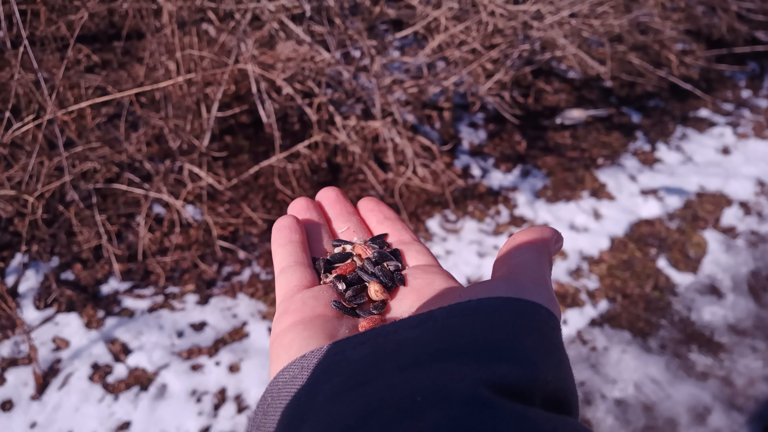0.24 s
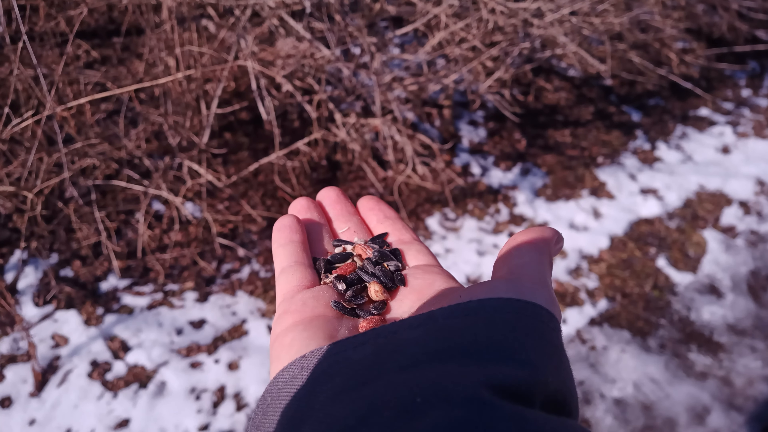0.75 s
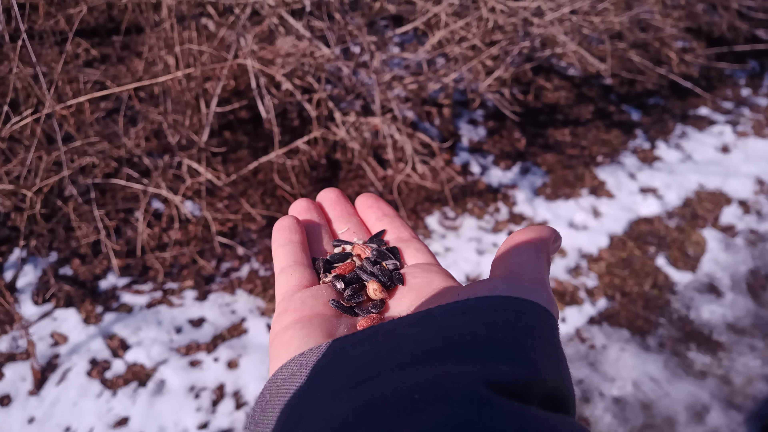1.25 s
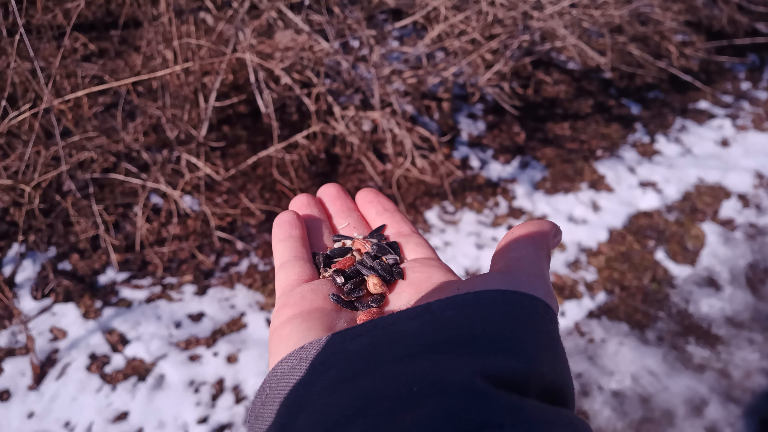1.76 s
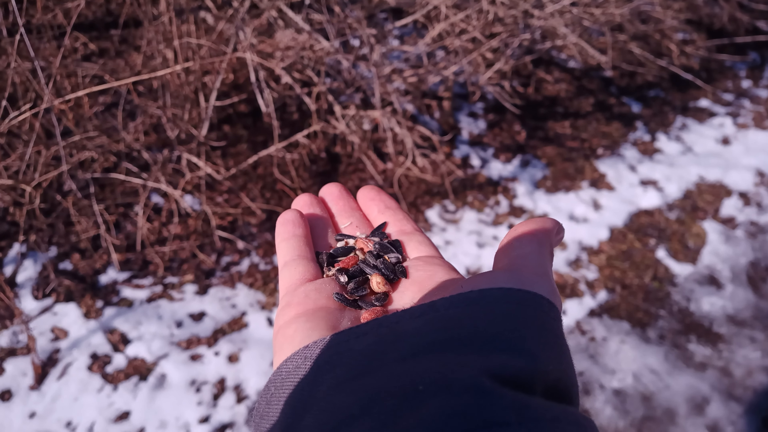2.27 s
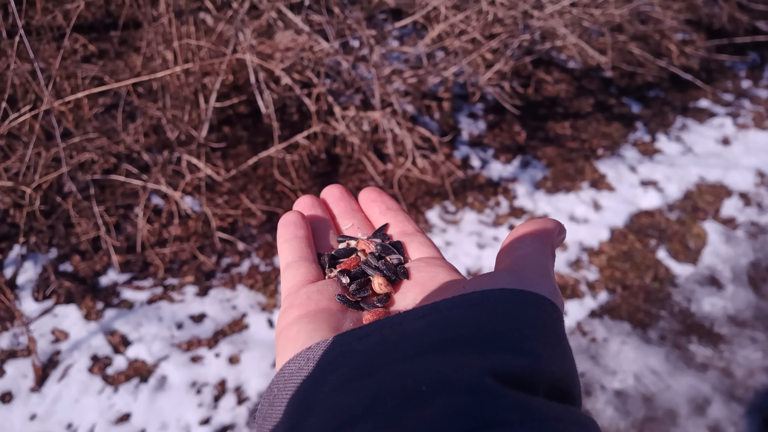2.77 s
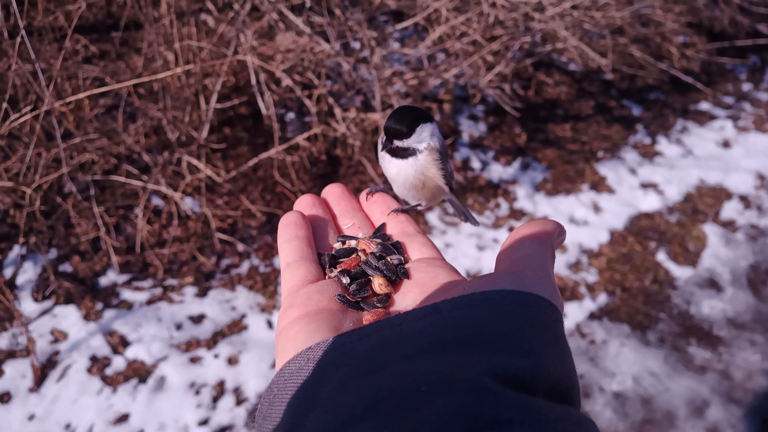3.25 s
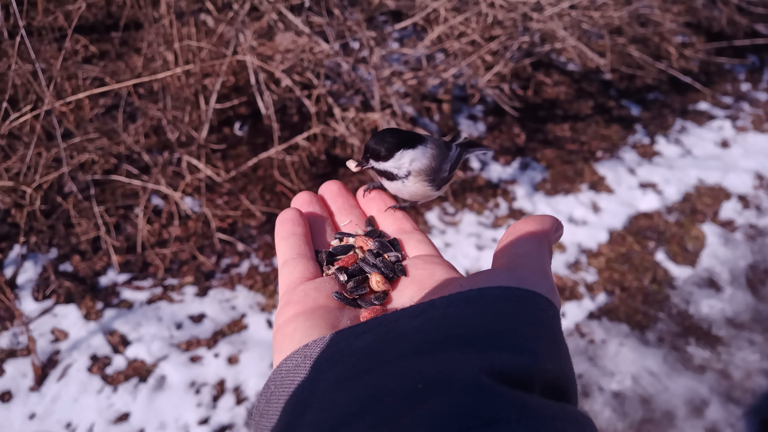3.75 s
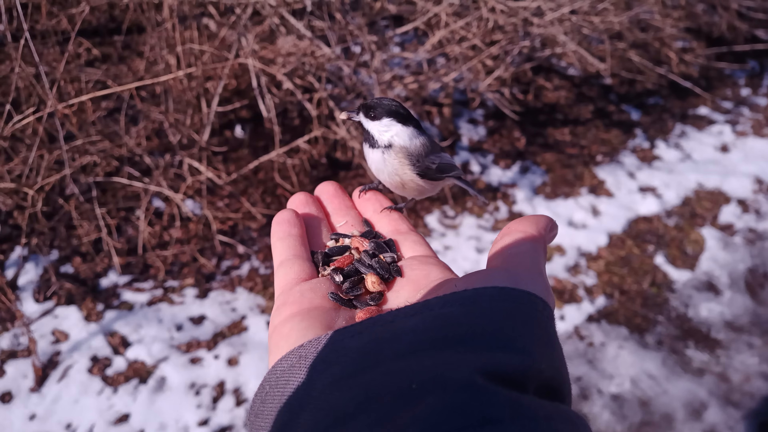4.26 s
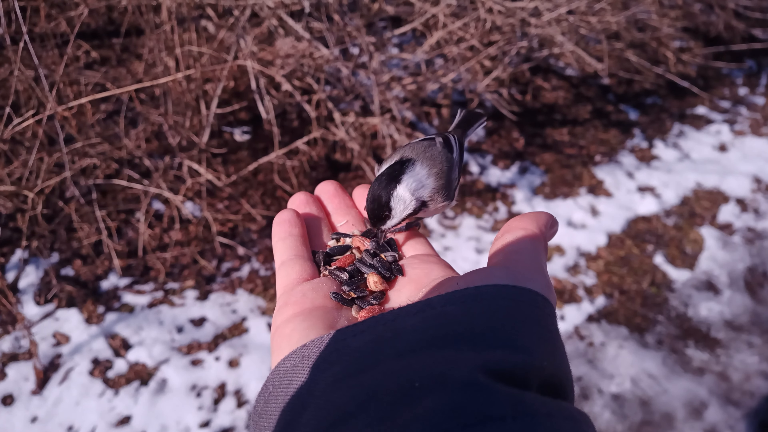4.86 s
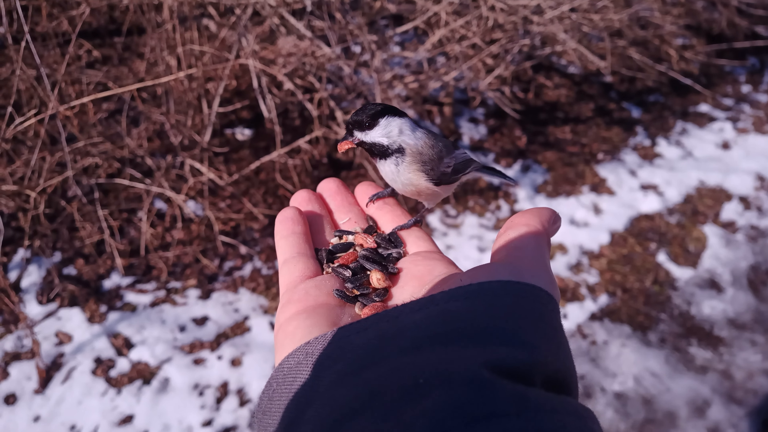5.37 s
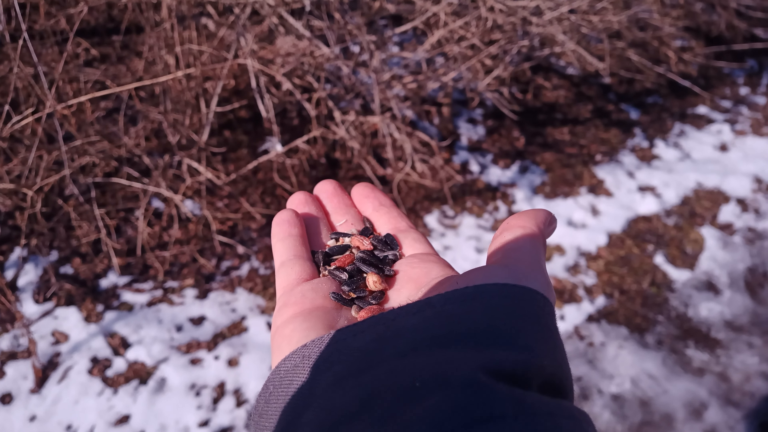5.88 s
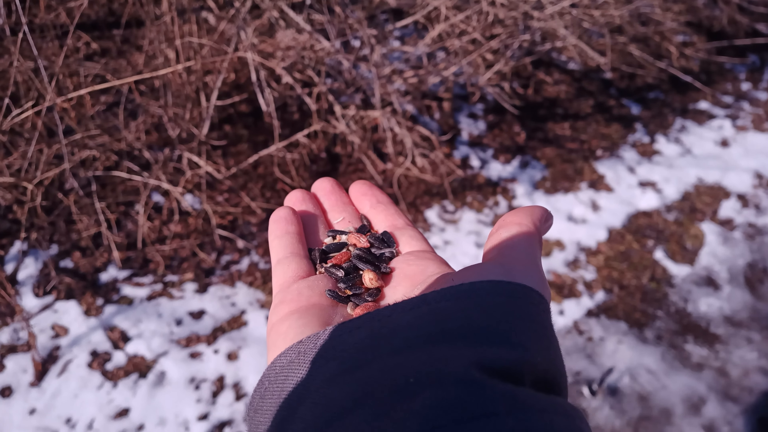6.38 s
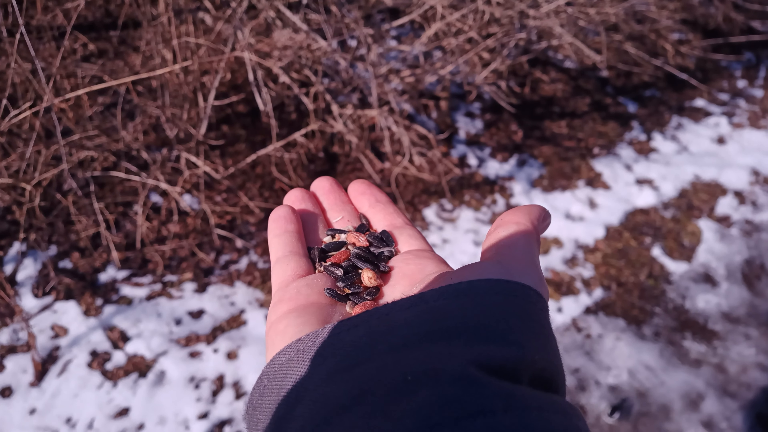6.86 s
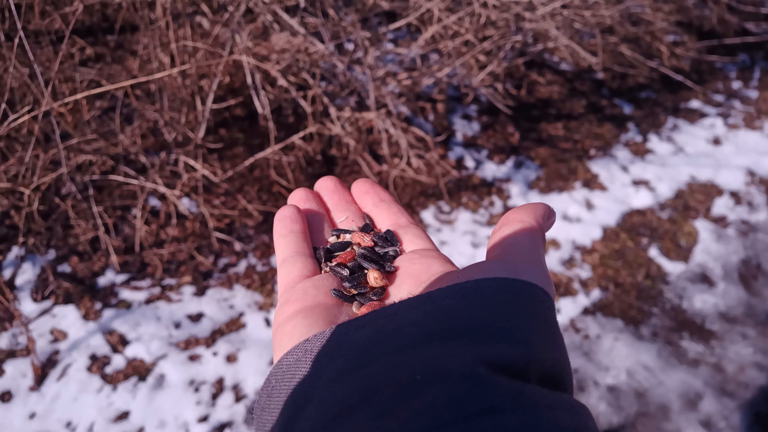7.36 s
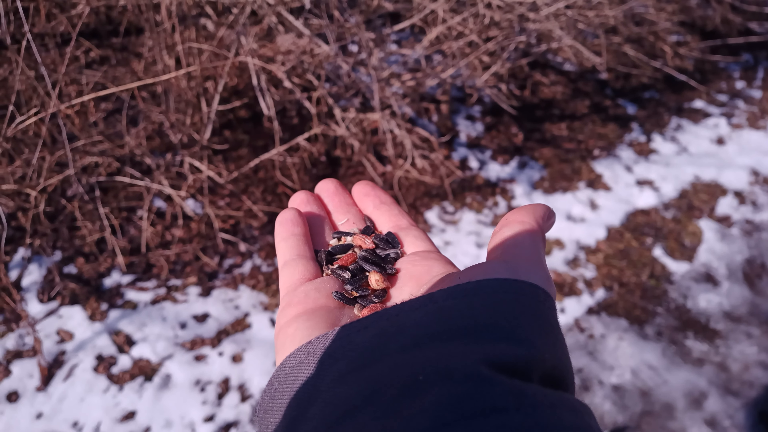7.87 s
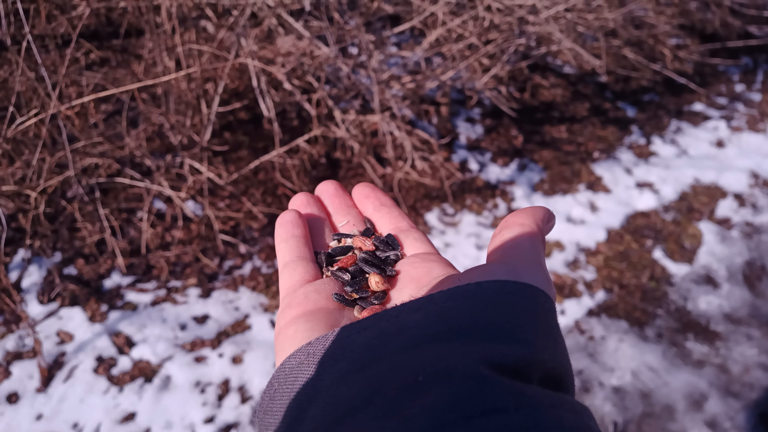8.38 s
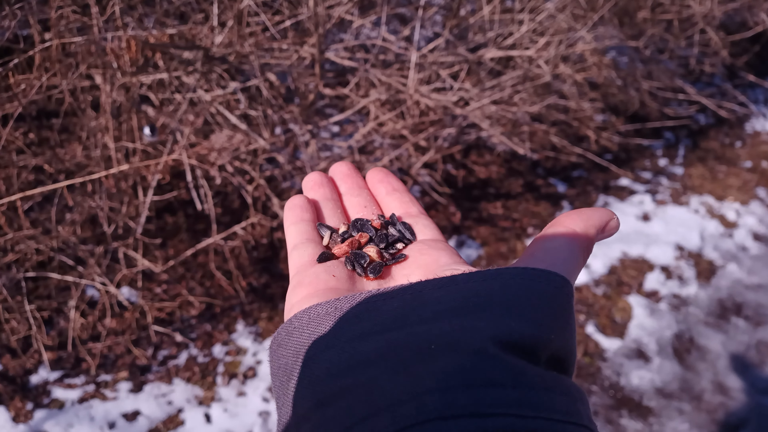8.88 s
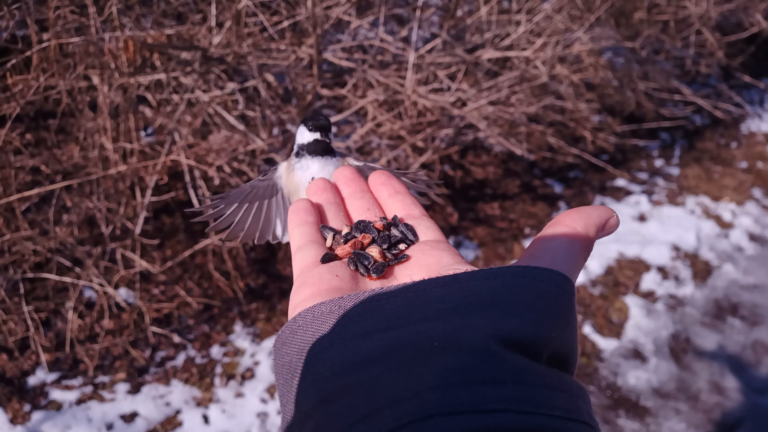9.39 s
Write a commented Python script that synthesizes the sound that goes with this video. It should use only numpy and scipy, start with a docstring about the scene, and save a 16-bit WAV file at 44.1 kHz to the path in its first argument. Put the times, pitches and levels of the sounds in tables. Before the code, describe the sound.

Chickadees give thin high chips, quick falling sweeps and buzzy notes outdoors; one flutters in, ticks at seeds and whirs away, before a brief dropout.

```python
"""Winter brush around an open hand with seeds, where chickadees flock. Gliding sines make the clear sweeps
and whistles close by and, with more echo, the blurred whistles farther off; combs of beating lines make
the buzzy notes and a puffed sine makes the trill. Wings flutter in shaped noise, claws and seeds tick as
cracks with a tiny ring, and far traffic hums in coloured noise over a low rumble, a blur of distant birds
and hiss. Near the end the sound is cut to silence and fades back in."""
import sys
import numpy as np
from scipy import signal
from scipy.fft import rfft, irfft, next_fast_len
from scipy.io import wavfile
from scipy.ndimage import uniform_filter1d, map_coordinates

SR = 44100
rng = np.random.default_rng(int(sys.argv[2]) if len(sys.argv) > 2 else 0)


def persist_wave(psi):
    """Save psi, clipped to +-1, as 16-bit WAV."""
    counts = np.round(np.clip(psi, -1, 1) * 32767).astype(np.int16)
    wavfile.write(sys.argv[1], SR, np.atleast_2d(counts).T)


N = 424683

# All table levels are mix levels, ahead of the microphone gain; spectra are relative shapes.

# Air bed over time: (time [s], rumble level [dB], traffic hum level [dB], far flock level [dB])
AIR_LEVELS = [(0, -60, -58, -66), (.55, -56, -59, -63), (1.17, -53, -58, -65.5), (2.15, -60.5, -59, -63),
              (2.49, -57, -59.5, -68.5), (3.5, -57.5, -61.5, -70), (4.62, -58, -59, -67.5),
              (5.36, -57.5, -61, -69.5), (5.8, -51, -59, -69.5), (6.06, -60.5, -62.5, -70),
              (6.54, -57, -60.5, -68), (7.11, -55, -61.5, -68.5), (7.55, -56.5, -60.5, -66.5),
              (8.46, -55, -60, -69), (8.9, -55.5, -57.5, -71), (9.3, -55, -59.5, -65),
              (9.63, -58, -61.5, -72)]
# Spectrum of the low rumble: (frequency [Hz], density [dB per Hz])
RUMBLE_SPECTRUM = [(20, -49), (35, -26.5), (55, -8.5), (80, -2), (120, 0.5), (160, -3), (220, -16.5),
                   (320, -32), (500, -60.5)]
# Spectrum of the far traffic hum: (frequency [Hz], density [dB per Hz])
HUM_SPECTRUM = [(120, -23.5), (200, -4), (260, -3), (380, -0.5), (550, 0), (800, -4.5), (1100, -8),
                (1600, -14.5), (2200, -22.5), (3500, -61)]
# Spectrum of the distant bird blur: (frequency [Hz], density [dB per Hz])
FLOCK_SPECTRUM = [(900, -25), (1600, -2.5), (2400, 0.5), (3200, -4.5), (5000, -10), (7000, -9.5),
                  (8000, -18.5), (8800, -30.5), (11000, -70)]
# Spectrum of the microphone hiss: (frequency [Hz], density [dB per Hz])
HISS_SPECTRUM = [(6000, -25), (8500, -14), (9800, -11.5), (10300, -12.5), (13700, -11.5), (14800, -4.5),
                 (16000, 2.5)]
HISS_PATCHY_DB = 1.2

# Wing strokes: (time [s], feather hiss drive [dB], air push drive [dB])
WING_STROKES = [(2.2, -61, -60), (2.26, -72, -56), (2.96, -56, -47), (3.005, -62, -48), (3.045, -58, -49),
                (3.1, -58, -56), (3.13, -63, -40.5), (3.191, -66, -45.5), (5.538, -54, -65),
                (5.562, -61, -60), (5.63, -49.5, -51), (5.655, -55, -39.5), (5.686, -59, -36),
                (5.74, -65, -40), (5.792, -76, -41), (5.83, -72, -46), (8.98, -64, -60), (9.02, -67, -56),
                (9.1, -62.5, -62), (9.16, -86, -44.5), (9.245, -63, -53), (9.279, -58.5, -37.5),
                (9.33, -61.5, -50), (9.39, -67, -58), (9.43, -71, -58), (9.47, -68.5, -60)]
# Spectrum of the feather hiss: (frequency [Hz], density [dB per Hz])
FEATHER_SPECTRUM = [(1000, -6.5), (2500, -6.5), (5000, -4.5), (7500, 2.5), (9000, -24.5), (13000, -33)]
FEATHER_PATCHY_DB = 2.5

# Claws and seeds, ahead of the tick colouring: (time [s], drive [dB], ring frequency [Hz])
CLAW_SEED_TICKS = [(3.4416, -49, 7650), (3.5005, -44, 6900), (3.70, -48.5, 5560), (4.146, -50, 6500),
                   (4.21, -51, 6500), (4.4518, -21.5, 6500), (4.966, -32, 6760), (4.983, -38, 6310),
                   (5.0687, -43.5, 6100), (5.0764, -49, 6330), (5.6274, -44, 6180), (9.0934, -38, 8150),
                   (9.285, -33, 6600), (9.3706, -37.5, 5800)]

# Distant slurs that glide to a held pitch, then glide again, some up and some slightly down,
# level ahead of the thinning:
# (time [s], first glide [s], hold [s], last glide [s], start [Hz], held pitch [Hz], end [Hz], level [dB])
DISTANT_SLURS = [(0.033, .08, .005, .005, 7950, 7050, 7020, -56),
                 (0.423, 0.049, .04, .005, 7070, 6660, 6600, -53.5),
                 (1.301, 0.19, 0.074, .01, 8320, 6780, 6740, -51.5),
                 (2.019, 0.2, 0.046, .03, 8300, 6490, 6450, -49.5),
                 (2.82, .2, .04, .01, 8050, 6750, 6490, -51.5),
                 (3.484, 0.041, 0.25, .055, 7800, 6620, 8150, -53.5),
                 (4.377, 0.042, 0.21, 0.053, 7780, 6660, 7520, -55.5),
                 (4.41, 0.081, 0.13, 0.039, 7330, 7400, 7170, -55),
                 (5.206, .12, .03, 0.097, 5750, 6060, 7730, -56),
                 (5.645, .12, .035, .065, 6150, 6620, 8220, -49.5)]
BEST_HZ, THIN_DB_PER_KHZ = 6770, 5.5  # a slur is loudest here and thins away from it
# Faint far peeps: (time [s], length [s], start [Hz], end [Hz], level [dB])
FAR_PEEPS = [(1.275, 0.047, 7920, 8140, -61), (1.97, .07, 7980, 8000, -62), (1.971, .12, 2004, 2080, -60),
             (2.734, .1, 7910, 8450, -60), (3.425, 0.044, 7900, 7740, -60.5),
             (3.725, 0.1, 4470, 4760, -68.5), (3.79, .08, 5000, 5150, -73), (4.571, .13, 4470, 4750, -67.5),
             (4.638, .1, 5000, 5230, -69), (4.658, 0.051, 7570, 7480, -57), (5.426, .08, 7560, 7760, -64),
             (4.07, 0.022, 7900, 7900, -78), (5.87, .12, 8240, 8400, -74),
             (6.555, 0.028, 7300, 7540, -56.5), (8.711, .12, 8040, 8060, -67.5),
             (8.894, 0.14, 7620, 8000, -67), (9.437, 0.028, 6040, 5930, -69)]
PEEP_BEND, PEEP_FADE_DB = .3, 12  # share of the glide done at half length; fade by the end

# Falling sweeps of the nearest bird, level ahead of the throat curve:
# (time [s], length [s], top [Hz], end [Hz], level [dB])
NEAREST_SWEEPS = [(.843, 0.044, 7480, 4710, -27.5), (0.92, .033, 7300, 5720, -27),
                  (0.994, 0.044, 7300, 4220, -24.5), (1.072, .049, 7100, 4220, -26),
                  (1.159, 0.039, 6950, 4400, -23), (1.228, 0.041, 8170, 4750, -26.5),
                  (1.345, 0.023, 6850, 5220, -31.5)]
# Loudness along a sweep: (frequency [Hz], gain [dB])
SWEEP_THROAT_GAIN = [(4200, -16.5), (5750, -15), (6400, 1.5), (7200, -14.5), (8200, -24)]
# Brief straight chips, level ahead of the throat curve:
# (time [s], length [s], start [Hz], end [Hz], level [dB])
BRIEF_CHIPS = [(0, 0.0057, 7800, 5800, -48), (.128, 0.0063, 8250, 4000, -36.5),
               (0.273, 0.0077, 5530, 7100, -38), (.298, 0.01, 8220, 4230, -37),
               (0.408, 0.011, 7060, 6550, -42), (0.689, 0.0083, 7200, 9440, -46),
               (0.78, 0.0058, 8060, 6950, -44), (0.891, 0.007, 6920, 8200, -37),
               (0.939, .008, 8840, 7650, -50), (1.089, .01, 8760, 7300, -45),
               (1.107, .008, 3680, 3340, -39.5), (1.241, 0.0092, 3010, 2840, -45),
               (1.703, .012, 7350, 5270, -43.5), (1.736, .012, 6400, 7900, -52.5),
               (5.861, 0.013, 7700, 4730, -42.5), (6.924, .006, 8160, 6720, -39.5),
               (6.977, 0.0069, 8100, 4400, -46.5), (7.12, 0.0054, 8000, 4590, -53),
               (7.334, .006, 8230, 5370, -42), (7.392, 0.0108, 6900, 5370, -38),
               (7.767, 0.0082, 7290, 5900, -40.5)]
# Loudness along a chip: (frequency [Hz], gain [dB])
CHIP_THROAT_GAIN = [(3000, -11), (5000, -13), (7200, 0), (9500, -12.5)]
# Short notes that swell and fade:
# (time [s], rise [s], fall [s], start [Hz], pitch at the peak [Hz], end [Hz], peak level [dB])
SWELLING_NOTES = [(.135, 0.029, .032, 3930, 3730, 3820, -53), (.19, 0.015, .004, 5180, 5050, 4900, -43),
                  (.205, .008, 0.024, 5010, 4500, 3360, -31.5), (.38, 0.014, .05, 3750, 3880, 3980, -58.5),
                  (.52, 0.019, 0.016, 6650, 6900, 7300, -48.5),
                  (.643, 0.0085, 0.011, 5100, 6180, 7870, -27), (.81, 0.014, 0.014, 4660, 4860, 4800, -54),
                  (1.722, 0.01, .012, 6100, 5100, 4600, -48.5), (7.91, .008, .022, 3740, 3800, 3250, -52),
                  (2.04, 0.0088, .015, 4400, 4450, 4320, -58), (3.165, 0.0093, .012, 4480, 3960, 3540, -61),
                  (3.205, .015, .015, 3730, 3610, 3580, -64),
                  (4.755, 0.0089, 0.0094, 3620, 3640, 3640, -66), (4.8, 0.0094, .05, 7940, 7850, 8030, -58),
                  (5.35, .01, 0.0092, 7540, 7600, 7670, -66), (5.533, .005, .018, 5800, 5170, 3300, -52),
                  (6.003, 0.0057, 0.012, 7410, 7500, 7500, -63),
                  (6.472, .006, 0.011, 2970, 2930, 2800, -40.5),
                  (6.58, 0.011, 0.022, 5650, 5530, 5400, -38), (6.586, .005, .02, 6780, 6650, 6560, -43),
                  (6.68, 0.009, 0.0052, 3350, 3250, 3250, -52), (6.868, 0.014, 0.03, 3810, 3770, 3600, -58),
                  (6.908, .017, .04, 3350, 3576, 3320, -42.5),
                  (7.038, 0.013, .013, 3110, 2915, 2680, -41.5),
                  (7.096, .006, .006, 3380, 4770, 3540, -42.5),
                  (7.355, 0.0089, 0.028, 4640, 4700, 4820, -58), (7.43, .04, 0.025, 3400, 3550, 3400, -46),
                  (7.44, .03, 0.028, 5900, 6100, 6100, -61), (7.44, 0.016, .02, 4020, 4250, 4300, -56),
                  (7.476, .006, 0.069, 5380, 5100, 5060, -55),
                  (7.565, 0.014, .015, 3430, 2950, 2870, -39.5),
                  (7.617, 0.0068, 0.0085, 3290, 4090, 2810, -36), (7.65, 0.022, .06, 9400, 9700, 9600, -66),
                  (7.852, 0.0062, 0.0062, 3500, 3950, 3380, -43),
                  (7.864, .008, .012, 3290, 2600, 2450, -44),
                  (8.097, 0.012, 0.011, 7700, 7500, 6050, -46.5), (8.17, .012, .006, 7600, 7380, 7400, -47),
                  (8.188, 0.0091, 0.0098, 7350, 7690, 7550, -35.5),
                  (8.218, 0.023, 0.046, 4480, 3890, 3860, -40.5),
                  (8.328, 0.0095, 0.012, 7110, 6500, 6040, -46),
                  (8.395, 0.0096, 0.019, 7640, 7560, 6000, -40.5)]
RISE_DB, FALL_DB = 9.5, 9.5  # a note starts and ends this far under its peak
# Rounded flight calls, up and over:
# (time [s], length [s], start [Hz], top [Hz], share of the arch sung [ratio], level at the top [dB])
FLIGHT_ARCHES = [(.078, 0.051, 3930, 5600, 1.05, -60), (2.746, 0.036, 5040, 7500, 1, -55.5),
                 (2.821, 0.036, 5150, 7400, 1, -53.5), (2.943, 0.023, 5170, 7170, .55, -54),
                 (3.025, .04, 5160, 6750, .98, -54.5), (3.113, .042, 4020, 4860, 1, -57.5)]
ARCH_LEAN = 1.25  # above 1 the climb is slower than the drop
ARCH_ROUND, ARCH_FOOT_DB = 0.697, 2  # flatness of the top; the feet are softer
# Longer clear whistles, one list of breakpoints each: (time [s], pitch [Hz], level [dB])
CLEAR_WHISTLES = [
    [(0.33, 7010, -44.5), (0.34, 6680, -39.5), (0.36, 6710, -38), (0.389, 6720, -29.5), (0.41, 6870, -40)],
    [(0.54, 6300, -57), (0.555, 6330, -45), (0.6, 6230, -51), (0.645, 6180, -43)],
    [(0.57, 4630, -47), (0.587, 4700, -32.5), (0.604, 3800, -33), (0.635, 2920, -53)],
    [(0.71, 6340, -40), (0.75, 6710, -33.5), (0.77, 6760, -38.5), (0.8, 6620, -51)],
    [(1.73, 2870, -60), (1.748, 3930, -40.5), (1.755, 5130, -32.5), (1.765, 3440, -34.5),
     (1.782, 2760, -40.5)],
    [(6.37, 3800, -49), (6.396, 3700, -49.5), (6.425, 4030, -52.5), (6.448, 3960, -65)],
    [(6.622, 4620, -46), (6.635, 4440, -33.5), (6.653, 4060, -44), (6.66, 4200, -36.5), (6.685, 4140, -69)],
    [(7.144, 7340, -44), (7.16, 7090, -40.5), (7.177, 7110, -42.5), (7.215, 6990, -35.5), (7.25, 7220, -43)],
    [(7.665, 7420, -66), (7.685, 7390, -30), (7.697, 7270, -41), (7.73, 7140, -35.5), (7.762, 7110, -40.5)],
    [(8.452, 7100, -53), (8.47, 7870, -50), (8.48, 7560, -49), (8.505, 7930, -47), (8.535, 6800, -58)],
]
# Buzzy notes, centre and rate ahead of the breath arch:
# (time [s], length [s], centre [Hz], glide from centre to end [ratio], buzz rate [Hz],
#  spread above the centre [Hz], level [dB], roughness [0-1])
BUZZY_NOTES = [(0.396, 0.078, 3200, 1, 287, 400, -61.5, 0.2), (1.785, 0.14, 3160, .985, 280, 350, -48, .27),
               (1.803, .11, 4060, 0.99, 284, 403, -52.5, 0.52),
               (2.011, 0.033, 6100, 0.93, 296, 700, -59.5, 1),
               (5.011, 0.057, 2190, 0.86, 270, 403, -61.5, 0.56),
               (5.612, 0.038, 3060, 1.1, 278, 500, -56, 0.36),
               (5.939, 0.11, 3220, 1.14, 270, 500, -68.5, 0.5),
               (6.367, 0.08, 2718, 1.02, 270, 298, -43.5, 0.14),
               (6.914, .11, 2744, 1.02, 294, 330, -43.5, 0.36),
               (7.419, 0.097, 2696, 1.01, 280, 340, -43, 0.2), (7.512, 0.028, 2936, 1, 276, 250, -45, .3),
               (7.925, .19, 3100, 0.97, 250, 300, -56.5, .35), (7.88, 0.3, 4200, 1.05, 250, 280, -63, 0.64),
               (2.142, .18, 2300, 1.0, 400, 500, -64, .45),
               (6.407, 0.025, 7100, 1.14, 300, 600, -64.5, 0.7),
               (6.68, 0.04, 6335, 0.98, 310, 700, -51, 0.75), (6.578, .03, 6300, 1.0, 300, 700, -54, .9),
               (6.375, .06, 6150, 0.92, 280, 250, -64, .5),
               (8.376, 0.0644, 4500, 0.94, 288, 296, -53.5, 0.54),
               (8.563, 0.075, 4180, 0.97, 295, 312, -48.5, 0.32)]
# Low trill, level ahead of the puffs: (time [s], pitch [Hz], level [dB])
LOW_TRILL = [(1.435, 2380, -58.0), (1.479, 2470, -54.5), (1.53, 2650, -46.5), (1.567, 2680, -46),
             (1.611, 2694, -45.5), (1.655, 2640, -66)]
REEDY_FROM_S, REEDY_TO_S = 6.57, 6.63  # close notes that start in this span carry a clear octave

BRUSH_T60_S, TREES_T60_S = 0.17, 0.48  # echoes from the brush and from the far trees
RING_STOP_S = 8.68  # no bird note from before this moment rings on after it

CUT_S, CUT_DB_PER_S = 8.627, 3500  # the sound drops away
BACK_S, BACK_GAIN = 8.712, 0.05  # it returns at a small gain
GAIN_RISE_S = 0.34  # and grows evenly, at a pace of one whole unit of gain in this time
GAIN_DB, TOP_HZ = 4.5, 15800  # microphone gain and band limit


def amp(db):
    """Gain of a level in dB."""
    return 10 ** (np.asarray(db) / 20)


def unit(x):
    """x at rms 1."""
    return x / np.sqrt(np.mean(x ** 2) + 1e-20)


def along(points, hz):
    """Read a curve of (Hz, value) points on a log frequency axis."""
    f, v = np.transpose(points)
    return np.interp(np.log(hz + 1), np.log(f + 1), v)


def wobble(rate, size=N):
    """A smooth random curve, rate knots a second up to 400."""
    knots = rng.standard_normal(int(size * 400 / SR) + 4)
    every_16th = np.arange(0, size + 16, 16)
    coarse = map_coordinates(knots, [every_16th * min(rate, 400) / SR])
    return np.interp(np.arange(size) / 16, np.arange(len(coarse)), coarse)


def filtered(x, response):
    """x times a response of frequency."""
    m = next_fast_len(N + SR // 2)
    return irfft(rfft(x, m) * response(np.fft.rfftfreq(m, 1 / SR)), m)[:N]


def rush(spectrum, patchy_db):
    """Coloured noise of rms 1 with time-frequency patches of random gain."""
    z = signal.stft(rng.standard_normal(N + 512), nperseg=512)[2]
    across_hz = uniform_filter1d(rng.standard_normal(z.shape), 5, 0)
    patches = unit(uniform_filter1d(across_hz, 10, 1))
    noise = signal.istft(z * amp(patchy_db * patches), nperseg=512)[1][:N]
    return unit(filtered(noise, lambda hz: amp(along(spectrum, hz))))


def add(track, s, sound):
    """Mix sound into track from second s on."""
    part = track[max(round(s * SR), 0):][:len(sound)]
    part += sound[:len(part)]


def echoes(sound, far_db):
    """Twigs and brush scatter a sound briefly, far trees for longer; each sound gets a random pattern."""
    t = np.arange(SR // 3) / SR
    twigs = amp(-60 * t / 0.031)
    brush = amp(-60 * t / BRUSH_T60_S)
    trees = amp(far_db - 60 * t / TREES_T60_S)
    tail = rng.standard_normal(len(t)) * (twigs + brush + trees)
    delayed = np.pad(sound, (70, 0))  # samples
    return signal.fftconvolve(delayed, tail / np.linalg.norm(tail))


def air():
    """Lumpy low rumble, the hum of far traffic, a blur of distant birds and microphone hiss, all noise."""
    s, *levels = np.transpose(AIR_LEVELS)
    rumble_db, hum_db, flock_db = [np.interp(np.arange(N) / SR, s, c) for c in levels]
    rumble = amp(rumble_db + 2.5 * wobble(9)) * rush(RUMBLE_SPECTRUM, patchy_db=3.0)
    hum = amp(hum_db + 0.51 * wobble(5.5)) * rush(HUM_SPECTRUM, patchy_db=3.0)
    flock = amp(flock_db + 0.52 * wobble(8)) * rush(FLOCK_SPECTRUM, patchy_db=3.5)
    hiss = amp(-76.0) * rush(HISS_SPECTRUM, HISS_PATCHY_DB)
    return rumble + hum + flock + hiss


def wings():
    """Each stroke hisses through the feathers and pushes a puff of air at the microphone."""
    hiss, push = np.zeros(N), np.zeros(N)
    t = np.arange(SR // 10) / SR
    swell = t * np.exp(1 - t / 0.011)  # peaks 11 ms in
    for s, hiss_db, push_db in WING_STROKES:
        add(hiss, s - .006, amp(hiss_db) * swell / 0.014)
        add(push, s - .01, amp(push_db) * swell / 0.021)
    puff = [(30, -44.0), (80, 4.5), (150, 2.0), (300, -4), (500, -24.5), (1000, -61.5)]  # (Hz, dB per Hz)
    feather_noise = rush([(300, -86)] + FEATHER_SPECTRUM, FEATHER_PATCHY_DB)
    return hiss * feather_noise + push * rush(puff, patchy_db=2.5)


def ticks():
    """Claws and seed husks: a crack and a very short ring, scattered by the brush."""
    out = np.zeros(N)
    t = np.arange(SR // 50) / SR
    onset = 1 - np.exp(-t / 0.00068)
    for s, db, hz in CLAW_SEED_TICKS:
        crack = 0.25 * rng.standard_normal(len(t)) * amp(-60 * t / 0.0096)
        ring = 0.48 * np.sin(2 * np.pi * hz * t) * amp(-60 * t / 0.0047)
        tick = amp(db) * (crack + ring) * onset
        add(out, s, tick)
        add(out, s, amp(-5.0) * echoes(tick, far_db=-25))
    colour = [(2000, -27), (4500, -9), (7500, 8), (9500, -10.5), (15000, -15.0)]  # (Hz, dB)
    return filtered(out, lambda hz: amp(along(colour, hz)))


def slur(s, first_glide, hold, last_glide, start_hz, held_hz, end_hz, db):
    """Outline of a glide, a hold and a second glide; thinner away from the best pitch."""
    times = s + np.cumsum([0, first_glide, hold, last_glide])
    pitches = [start_hz, held_hz, held_hz, end_hz]
    return [(t, hz, db - THIN_DB_PER_KHZ * abs(hz - BEST_HZ) / 1000) for t, hz in zip(times, pitches)]


def peep(s, length, start_hz, end_hz, db):
    """Outline of a peep that does most of its bend late and fades over its second half."""
    bend_hz = start_hz + PEEP_BEND * (end_hz - start_hz)
    return [(s, start_hz, db), (s + length / 2, bend_hz, db), (s + length, end_hz, db - PEEP_FADE_DB)]


def far_notes():
    """(s, Hz, dB) outlines of the far slurs and peeps."""
    return [slur(*r) for r in DISTANT_SLURS] + [peep(*r) for r in FAR_PEEPS]


def glide(s, length, start_hz, end_hz, db, throat):
    """Outline of a straight glide whose loudness follows the throat."""
    u = np.linspace(0, 1, num=12)
    hz = start_hz + (end_hz - start_hz) * u
    return np.transpose([s + length * u, hz, db + along(throat, hz)]).tolist()


def swell_note(s, rise, fall, start_hz, peak_hz, end_hz, db):
    """Outline of a short note that swells to its peak and fades."""
    peak_s = s + rise
    return [(s, start_hz, db - RISE_DB), (peak_s, peak_hz, db), (peak_s + fall, end_hz, db - FALL_DB)]


def arch(s, length, start_hz, top_hz, share, db):
    """A pitch that climbs, rounds over past the middle and drops more steeply, as far as the share allows."""
    u = np.linspace(0, 1, num=12)
    bow = np.sin(np.pi * share * u ** ARCH_LEAN)
    bow = np.sign(bow) * np.abs(bow) ** ARCH_ROUND
    hz = start_hz + (top_hz - start_hz) * bow
    return np.transpose([s + length * u, hz, db - ARCH_FOOT_DB * (1 - bow)]).tolist()


def close_notes():
    """(s, Hz, dB) outlines of all near whistled notes."""
    sweeps = [glide(*r, SWEEP_THROAT_GAIN) for r in NEAREST_SWEEPS]
    chips = [glide(*r, CHIP_THROAT_GAIN) for r in BRIEF_CHIPS]
    swells = [swell_note(*r) for r in SWELLING_NOTES]
    arches = [arch(*r) for r in FLIGHT_ARCHES]
    return sweeps + chips + swells + arches + CLEAR_WHISTLES


def whistle(rows, fade, waver_hz, flutter_db, octave_db=-70):
    """One membrane of the syrinx: a gliding sine, unsteady in pitch and strength."""
    s, hz, db = np.transpose(sorted(rows))
    t = s[0] - fade + np.arange(round((s[-1] - s[0] + 2 * fade) * SR)) / SR
    smooth_pitch = uniform_filter1d(np.interp(t, s, hz), size=min(len(t) // 6, 400))
    pitch = smooth_pitch + waver_hz * wobble(300, size=len(t))
    phase = 2 * np.pi * np.cumsum(pitch) / SR
    to_edge = np.minimum(t - t[0], t[-1] - t)
    edges = np.sin(np.pi / 2 * np.clip(to_edge / (2 * fade), 0, 1)) ** 2
    gain = edges * amp(np.interp(t, s, db) + flutter_db * wobble(173, size=len(t)))
    return gain * (np.sin(phase) + amp(octave_db) * np.sin(2 * phase))


def buzz(length, centre_hz, glide_ratio, rate_hz, spread_hz, db, rough):
    """Both membranes beat together: a comb of lines, rate_hz apart, under the throat resonance."""
    u = np.linspace(0, 1, round(length * SR))
    k = np.arange(-3, 8)[:, None]  # line numbers around the centre
    jitter = np.array([wobble(280, size=len(u)) for _ in k])
    breath = 1 + 0.0213 * np.sin(np.pi * u)  # the pitch rises with the breath and sags again
    lines_hz = breath * (centre_hz * glide_ratio ** (2 * u - 1) + k * rate_hz)
    pitch = lines_hz + 170 * rough * jitter + 20 * wobble(40, size=len(u))
    width_hz = np.where(k < 0, 230, spread_hz)  # fixed width below the centre
    throat = np.exp(-(k * rate_hz / width_hz) ** 2 / 2)
    line_gain = throat * amp(10 * rough * jitter[::-1])
    comb = line_gain * np.sin(2 * np.pi * np.cumsum(pitch, 1) / SR)
    tone = unit(comb.sum(0))
    # hard closing of the membranes adds an octave band
    haze = amp(-33) * (tone ** 2 - uniform_filter1d(tone ** 2, size=24))
    return amp(db) * (tone + haze) * np.sin(np.pi * u ** 0.86) ** 1.13


def close_voice(rows):
    """A near whistle as (start, sound, echo dB); chips waver most and chips and faint notes echo more."""
    start = rows[0][0]
    chip = rows[-1][0] - start < .0125  # the briefest notes are mostly echo
    faint = max(row[-1] for row in rows) < -45  # faint notes come from deeper in the brush
    reedy = REEDY_FROM_S < start < REEDY_TO_S
    fade = .0012 if chip else .0025
    waver_hz = 350 if chip else 70 if faint else 40
    echo_db = 1.5 if chip else -3.5 if faint else -8
    note = whistle(rows, fade, waver_hz, flutter_db=1.5, octave_db=-31 if reedy else -50)
    return start, note, echo_db


def far_voice(rows):
    """A far whistle as (start, sound, echo dB): the second membrane sings a little higher and softer."""
    upper = [(s, min(1.06 * hz, 8250), db - 10) for s, hz, db in rows]
    pair = [whistle(v, .008, waver_hz=95, flutter_db=2.0) for v in (rows, upper)]
    return rows[0][0], sum(pair), .8


def trill_voice():
    """The low trill as (start, sound, echo dB): a whistle chopped into about fifty puffs a second."""
    tone = whistle(LOW_TRILL, 0.0043, waver_hz=24, flutter_db=4.0)
    t = np.arange(len(tone)) / SR
    puffs = np.abs(np.sin(np.pi * 50.5 * (t - .005))) ** 1.5
    return LOW_TRILL[0][0], 1.47 * tone * puffs, -12


def birds():
    """Every note with its echoes; the farther the bird, the more echo blurs it."""
    out = np.zeros(N)
    notes = [far_voice(c) for c in far_notes()]
    # rougher buzzes come from farther off
    notes += [(s, buzz(*voice), 9 * voice[-1] - 8) for s, *voice in BUZZY_NOTES]
    notes.append(trill_voice())
    notes += [close_voice(c) for c in close_notes()]
    for s, note, echo_db in notes:
        heard = out[:round(RING_STOP_S * SR)] if s < RING_STOP_S else out
        add(heard, s - .0025, note)
        add(heard, s - .0025, amp(echo_db) * echoes(note, far_db=-10.5))
    return out


def scene():
    """All sources at one microphone."""
    return (air() + wings() + ticks() + birds())[None]


def record(dry):
    """A cut to silence and a fade back in; nothing is kept above the band limit."""
    t = np.arange(N) / SR
    cut = amp(-CUT_DB_PER_S * np.clip(t - CUT_S, 0, 1))
    fade_in = np.clip(BACK_GAIN + (t - BACK_S) / GAIN_RISE_S, 0, 1)
    gain = np.where(t < BACK_S, cut, fade_in)
    return filtered(dry[0] * amp(GAIN_DB) * gain, lambda hz: hz < TOP_HZ)[None]


dry = scene()
out = record(dry)
persist_wave(out)
```